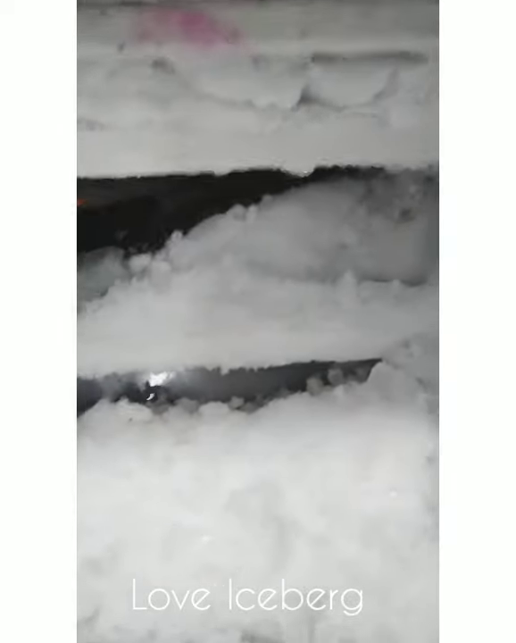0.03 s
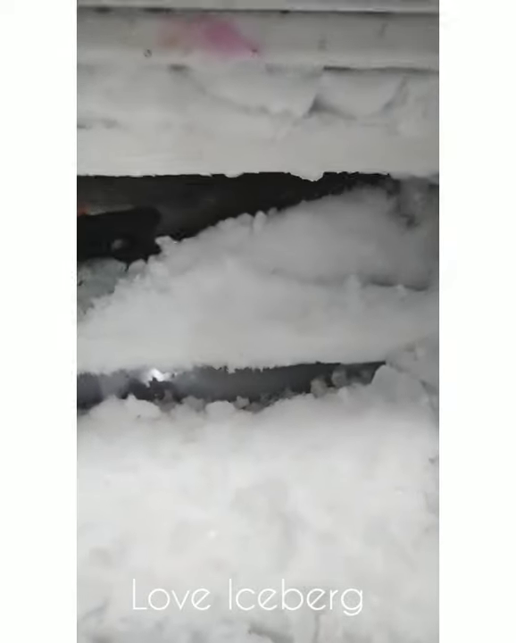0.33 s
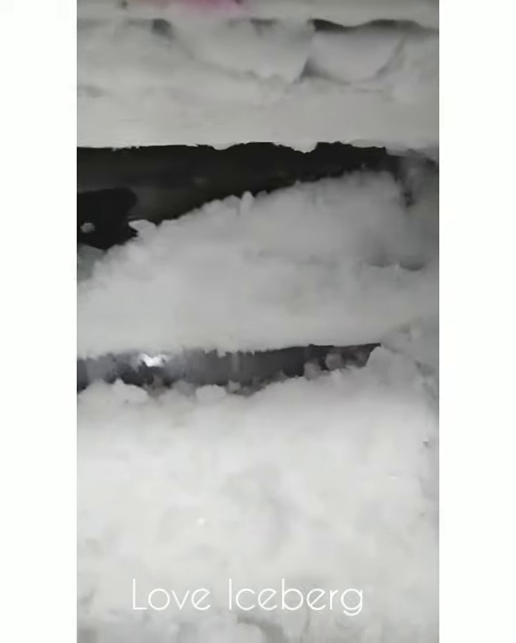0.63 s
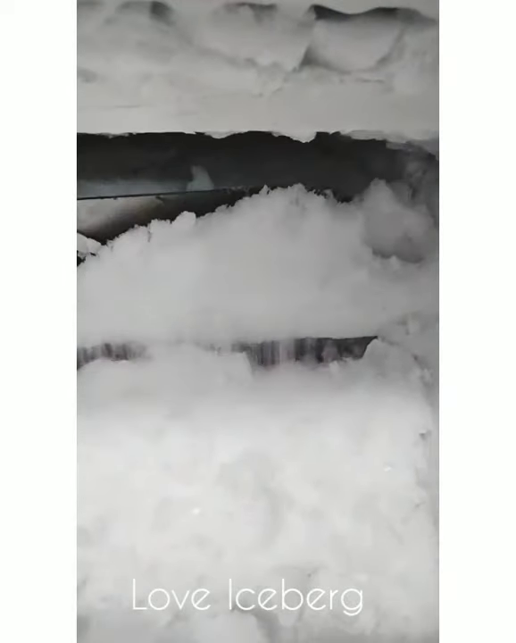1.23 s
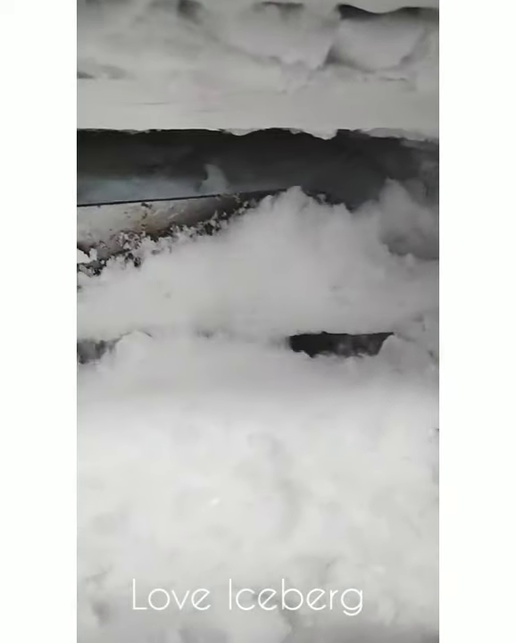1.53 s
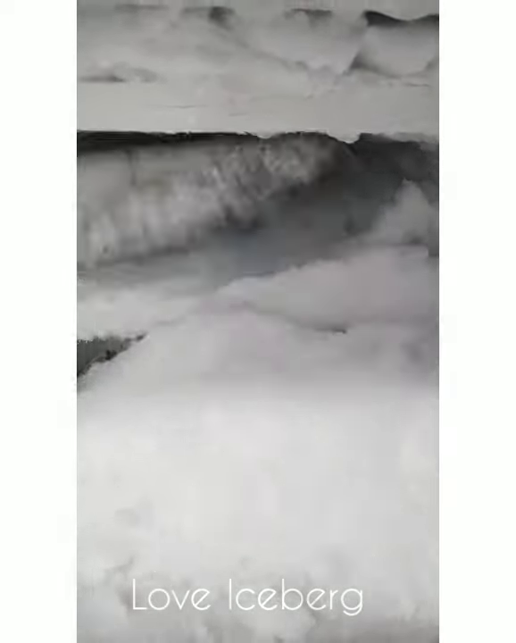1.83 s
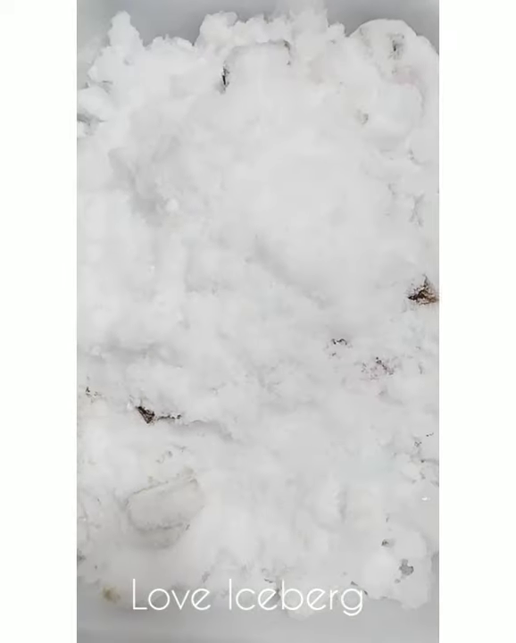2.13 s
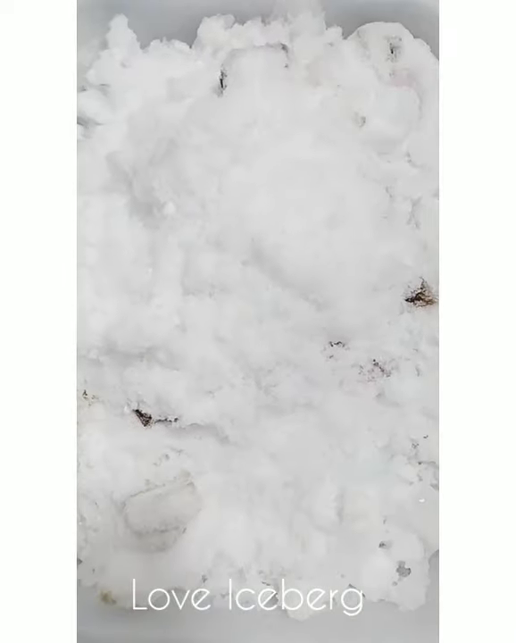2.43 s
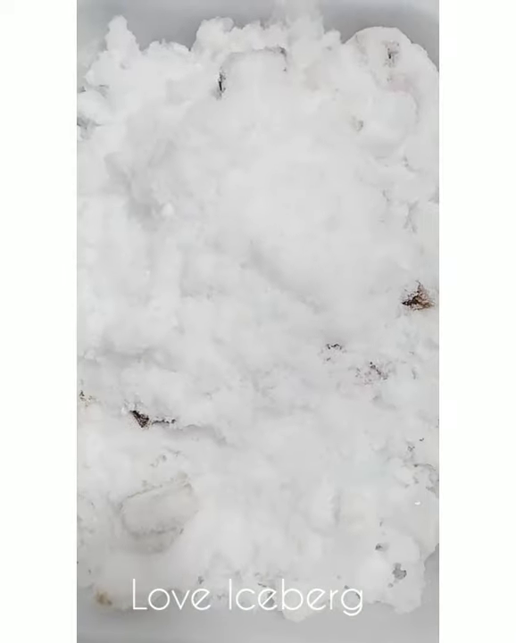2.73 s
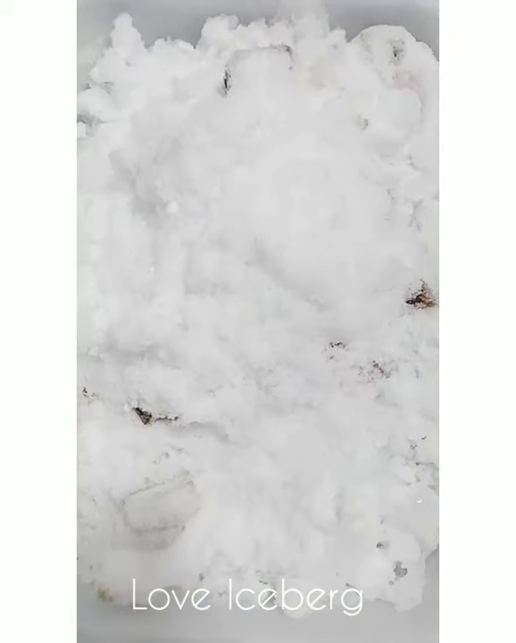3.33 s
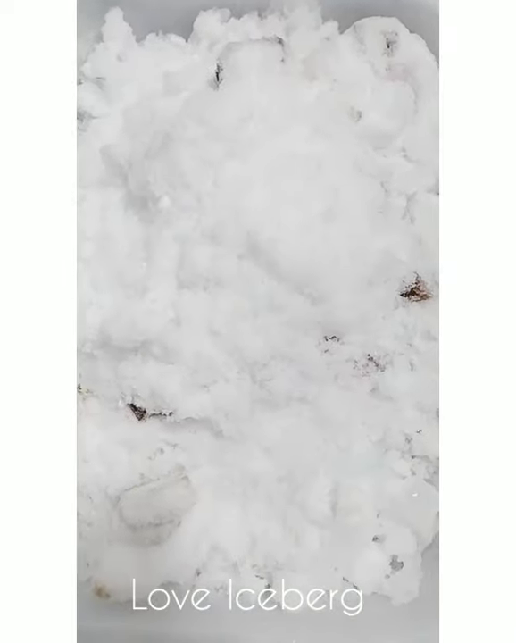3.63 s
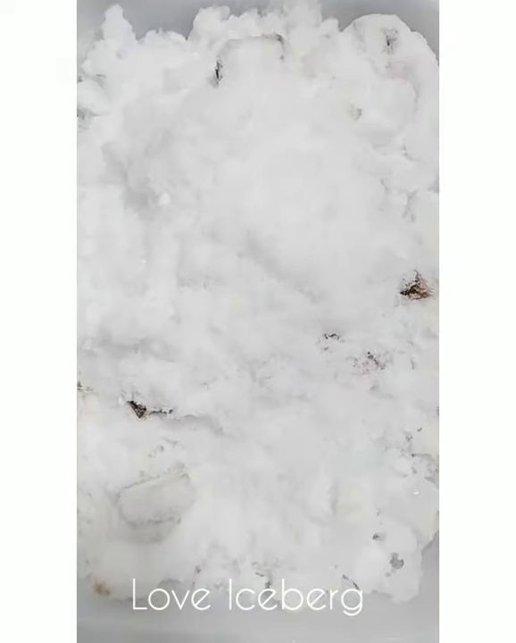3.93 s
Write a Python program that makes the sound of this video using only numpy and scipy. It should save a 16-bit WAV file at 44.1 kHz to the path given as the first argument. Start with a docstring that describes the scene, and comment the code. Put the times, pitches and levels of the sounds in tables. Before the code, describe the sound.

Loud, close scraping chips ice out of a humming freezer, with crisp crackles and a couple of low bumps. Halfway through it stops, leaving low room noise, faint handling scuffs, a tick and a light tap.

```python
"""Scraping frost from a freezer

Thick frost is scraped off a running freezer in uneven strokes, very close by. Countless ice crystals
snap, clumps break away, and the hollow cabinet answers over the compressor's hum. After about two
seconds the sound cuts to a quiet room with faint scuffs, rustles, a tick and a tap."""
import sys
import numpy as np
from scipy import signal
from scipy.fft import rfft, irfft, next_fast_len
from scipy.io import wavfile
from scipy.ndimage import map_coordinates

SR = 44100
rng = np.random.default_rng(int(sys.argv[2]) if len(sys.argv) > 2 else 0)


def persist_wave(psi):
    """Save psi, clipped to +-1, as 16-bit WAV."""
    counts = np.round(np.clip(psi, -1, 1) * 32767).astype(np.int16)
    wavfile.write(sys.argv[1], SR, np.atleast_2d(counts).T)


N = 176400

# The four pitch bands of the scraping: cabinet, crunch, sizzle, fizz. Each row: low and high edge in Hz.
ICE_BANDS = [(115, 700), (700, 7000), (7000, 11000), (11000, 16000)]
# Strokes of the blade. Each row: start and end in seconds, four band levels in dB, swell in dB.
BLADE_STROKES = [(0.052, 0.091, -35.5, -37.5, -33, -35.5, -0.5), (0.183, 0.218, -59, -34, -24, -29, 2),
                 (0.223, 0.319, -39.5, -37, -31.5, -36.5, 1.5),
                 (0.315, 0.486, -28.5, -34.5, -27.5, -36, -0.5), (0.505, 0.62, -31, -31.5, -24, -32, 1),
                 (0.613, 0.663, -25.5, -35.5, -30, -34, 0.5),
                 (0.713, 0.767, -28.5, -33.5, -33, -39.5, -1.5),
                 (0.754, 0.823, -27.5, -31.5, -25.5, -31.5, -4.5), (0.86, 0.936, -33.5, -34, -33, -32, -3),
                 (0.944, 1, -28, -35.5, -30, -30, 2.5), (1.024, 1.049, -28, -41, -31, -34, -7),
                 (1.071, 1.095, -28.5, -39.5, -36, -42.5, -5),
                 (1.099, 1.144, -26.5, -30.5, -30.5, -37.5, -2.5),
                 (1.126, 1.46, -33.5, -33.5, -30.5, -31, 3.5), (1.465, 1.507, -33, -29.5, -24.5, -29, -4.5),
                 (1.586, 1.625, -28.5, -30.5, -26, -34.5, -5), (1.69, 1.774, -33.5, -32.5, -30, -29.5, 0),
                 (1.802, 1.821, -33.5, -31.5, -36, -34, -7), (1.872, 1.895, -41, -36.5, -52, -48, 5)]
# Clumps of ice breaking away. Each row: time in seconds, four band levels in dB.
CLUMP_BREAKS = [(.01, -19, -31, -30, -36.5), (0.13, -59, -57, -43, -51.5), (.361, -25, -33.5, -20.5, -29),
                (0.514, -47, -43, -26.5, -32), (1.107, -30.5, -36.5, -23, -23), (1.608, -27, -27, -24, -21),
                (1.756, -34, -24, -22.5, -22.5), (1.917, -35, -36.5, -23, -24.5)]
# Loose crumbs between strokes. For each band: level in dB halfway through the scraping.
CRUMB_LEVELS = [-35, -42.5, -44, -47]
# More crumbs fall as the ice gives way. For each band: growth in dB per second.
CRUMB_GROWTH = [0.5, 0.5, 1, 5.5]
# The blade lifts clear. Each row: time and half-length in seconds, drop in the crumbs' level in dB.
BLADE_LIFTS = [(0.115, .012, 6.5), (0.688, .018, 7), (1.568, .01, -0.5)]
# Pitches boosted or weakened in the scraping, including the microphone's bright peak near 8.5 kHz.
# Each row: pitch in Hz, width in Hz, boost in dB.
SCRAPE_RESONANCES = [(154, 12, 8), (238, 18, -2), (315, 6.7, 6.5), (538.6, 56, 14), (824, 100, 5),
                     (1550, 180, 4.5), (1912, 160, 2.5), (3200, 90, -1.5), (4380, 130, 4.5), (7900, 80, -3),
                     (8430, 160, 6.5), (9150, 120, 4.5)]
# Brief, narrow rings and squeaks during the scraping.
# Each row: start and end in seconds, pitch and width in Hz, level in dB.
NARROW_RINGS = [(.33, .6, 8700, 360.7, -32.5), (0.712, 0.95, 8600, 255, -36),
                (.752, 0.72, 8670, 200, -28.5), (0.87, 0.922, 8500, 200, -26),
                (0.337, 0.46, 8150, 350, -34.5), (0.99, 1.01, 588, 46.3, -37), (1.094, 1.113, 385, 90, -25),
                (1.604, 1.625, 565, 46.3, -31), (1.74, 1.78, 560, 32.4, -26), (1.739, 1.75, 3260, 310, -28),
                (0.53, 1.416, 15000, 583, -44)]
# The compressor's tones. Each row: pitch in Hz, level in dB.
HUM_TONES = [(99.9, -30.5), (64.8, -42.5)]
# The scraper bumps the cabinet. Each row: time in seconds, level in dB.
CABINET_BUMPS = [(0.014, -19), (1.108, -22)]
# Scuffs of the hand. Each row: start in seconds, level in dB.
HAND_SCUFFS = [(1.985, -64.5), (2.387, -52.5), (3.56, -58.5)]
# Handling rustles. Each row: time and half-length in seconds, level in dB.
HANDLING_RUSTLES = [(2.011, .03, -52.5), (2.626, 0.014, -67), (2.733, 0.0245, -64.5), (3.24, 0.062, -61),
                    (3.604, 0.035, -59), (3.751, .008, -64)]
# The tones of the tap. Each row: pitch in Hz, relative level in dB, seconds to fade by 60 dB.
TAP_TONES = [(378, 1.5, 0.052), (480, -8.5, .03), (990, -21, 0.088), (1350, -12, 0.038), (1850, -11, .025),
             (3770, -7, 0.014)]

# A spectrum gives a sound its colour, from low to high. Each row: frequency in Hz, relative level in dB.
ICE_SPECTRUM = [(100, 16.5), (160, 8.5), (280, 4), (420, 0), (700, -5), (2000, -8), (3500, -13),
                (5500, -12), (7000, -10), (7800, -7.5), (8800, -2), (10200, -7), (11200, -13.5),
                (13000, -10), (14300, -4), (15800, -4)]  # a snapping crystal
SHUDDER_SPECTRUM = [(20, -9.5), (40, -3), (60, -4), (110, -6), (150, -10), (300, -45.5)]  # the rumbling cabinet
ROOM_SPECTRUM = [(12, -51), (20, 10.5), (27, -11), (59, 0), (122, -16.5), (225, -15.5), (298, -20),
                 (382, -16), (416, -23), (534, -24), (932, -29.5), (1100, -25.5), (1200, -30),
                 (4310, -38.5), (15500, -42.5)]
SCUFF_SPECTRUM = [(300, -28), (900, 1), (1350, 3), (2400, -3.5), (3300, -10.5), (9000, -19), (15000, -25)]
RUSTLE_SPECTRUM = [(300, -26), (1200, 0), (3000, -5), (6000, -8), (8800, 11), (11500, -5), (15500, -2)]
TICK_SPECTRUM = [(500, -20.5), (7000, -13.5), (9000, -0.5), (11500, -14), (14000, 0.5), (16000, -5.5)]
CONTACT_SPECTRUM = [(200, -3.5), (500, 7), (1500, -9), (4000, -14), (6000, -19), (9000, -9), (15500, -30)]  # the touch that starts the tap

ATTACK_S, RELEASE_S = 0.001, 0.012  # how quickly strokes and rings rise and die away
FADE_S, SILENT_S, ROOM_START_S, ROOM_END_S = 1.8605, 1.935, 1.969, 3.93
TIME = np.arange(N) / SR  # in seconds


def amp(db):
    """Turn decibels into a number to multiply by."""
    return 10 ** (np.asarray(db) / 20)


def unit(x):
    """Scale a signal to an average (rms) strength of 1."""
    return x / np.sqrt(np.mean(x ** 2) + 1e-20)


def level_at(spectrum, hz):
    """Read a spectrum's level in dB between its rows."""
    frequencies, levels = np.transpose(spectrum)
    return np.interp(np.log(hz + 1), np.log(frequencies + 1), levels)


def wobble(per_s):
    """A smooth curve through per_s random values each second."""
    return map_coordinates(rng.standard_normal(N // 8), [TIME * per_s], mode="wrap")


def filtered(x, gain_at):
    """Scale each frequency of x by gain_at(hz), then bring the result to strength 1."""
    size = 2 * next_fast_len(N)
    gain = np.maximum(gain_at(np.fft.rfftfreq(size, 1 / SR)), 1e-6)
    cepstrum = irfft(np.log(gain))
    # Folding this in half makes the filter ring only after a sound, never before it.
    cepstrum[1:size // 2] *= 2
    cepstrum[size // 2 + 1:] = 0
    return unit(irfft(rfft(x, size) * np.exp(rfft(cepstrum)))[:N])


def coloured(x, spectrum):
    """Give x the colour of a spectrum, at strength 1."""
    return filtered(x, lambda hz: amp(level_at(spectrum, hz)))


def noise(spectrum):
    """Steady noise with the colour of a spectrum."""
    return coloured(rng.standard_normal(N), spectrum)


def held(start, end, attack_s, release_s):
    """A loudness curve that rises until start, holds, and dies away after end."""
    return np.exp(-np.maximum(start - TIME, 0) / attack_s - np.maximum(TIME - end, 0) / release_s)


def snaps(per_s=6000, spread_db=4):
    """Tiny clicks, like crystals snapping at random moments with very unequal force."""
    clicks = (rng.random(N) < per_s / SR) * np.sign(rng.standard_normal(N))
    force = amp(spread_db * np.minimum(rng.standard_normal(N), 2))
    return unit(clicks * force)


def crunch(cracks_per_s=260, cracks_db=-6):
    """Larger crystals crack here and there among the fine snaps."""
    cracks = (rng.random(N) < cracks_per_s / SR) * rng.uniform(-1, 1, N)
    return unit(snaps() + amp(cracks_db) * unit(cracks))


def compartment_echo(x, fade_s=0.057, echo_db=-3.5, moves_per_s=14):
    """Add the short, dense echo of the frosted compartment, which changes as the blade moves."""
    age = np.arange(SR // 12) / SR
    hop = int(SR / moves_per_s)
    padded, window = np.pad(x, (hop, hop)), signal.get_window("hann", 2 * hop)
    tails = rng.standard_normal((256, len(age))) * amp(-60 * age / fade_s)
    echoes = np.zeros(N + SR)
    for start, tail in zip(range(0, N, hop), tails):  # each slice of sound gets its own echo
        echo = signal.fftconvolve(padded[start:start + 2 * hop] * window, tail / np.linalg.norm(tail))
        echoes[start:start + len(echo)] += echo
    return x + amp(echo_db) * echoes[hop:hop + N]


def ice_colour(hz, low_hz, high_hz):
    """How strong each frequency of the scraping is within one band."""
    in_band = ((1 + (low_hz / (hz + 1)) ** 14) * (1 + (hz / high_hz) ** 14)) ** -.5
    boost_db = sum(db / (1 + (2 * (hz - pitch) / width) ** 2) for pitch, width, db in SCRAPE_RESONANCES)
    return in_band * amp(level_at(ICE_SPECTRUM, hz) + boost_db)


def ice_loudness(band):
    """The strength of one band over time: loose crumbs, blade strokes and breaking clumps add up."""
    crumbs = amp(CRUMB_LEVELS[band] + CRUMB_GROWTH[band] * (TIME - FADE_S / 2))
    for when, length, drop_db in BLADE_LIFTS:
        crumbs *= amp(-drop_db * np.exp(-((TIME - when) / length) ** 2))
    power = crumbs ** 2
    for start, end, *levels, swell_db in BLADE_STROKES:
        progress = np.clip((TIME - start) / (end - start), 0, 1) - .5
        soft_start_db = -1.5 * np.exp(-np.maximum(TIME - start, 0) / 0.0065)
        shape = held(start + ATTACK_S, end - RELEASE_S / 2, ATTACK_S, RELEASE_S)
        power += (shape * amp(levels[band] + swell_db * progress + soft_start_db)) ** 2
    rise_s, fall_s = 0.0099, (0.015 if band == 0 else 0.0064)  # the cabinet band lingers longest
    for when, *levels in CLUMP_BREAKS:
        width = np.where(TIME < when, rise_s, fall_s)
        power += amp(levels[band]) ** 2 * np.exp(-((TIME - when) / width) ** 2)
    return np.sqrt(power)


def shimmer(x, depth_db=1.2, changes_per_s=16):
    """Narrow patches of the spectrum swell and sink at random."""
    slices = signal.stft(x, nperseg=512)[2]
    rows, columns = slices.shape
    slices_per_change = SR / 256 / changes_per_s
    grid = np.meshgrid(np.arange(rows), np.arange(columns) / slices_per_change, indexing="ij")
    swells = map_coordinates(rng.standard_normal(slices.shape), grid, order=1, mode="wrap")
    return signal.istft(slices * amp(depth_db * unit(swells)), nperseg=512)[1][:N]


def scraping(shared=0.62):
    """Bunches of snaps echo through the cabinet, with a ring or squeak now and then."""
    common = crunch()  # heard in every band; shared is its part of the power
    bunching = amp(wobble(220))
    sound = np.zeros(N)
    for band, edges in enumerate(ICE_BANDS):
        grains = bunching * (np.sqrt(shared) * common + np.sqrt(1 - shared) * snaps())
        ice = filtered(compartment_echo(grains), lambda hz: ice_colour(hz, *edges))
        sound += ice_loudness(band) * ice
    for start, end, hz, width_hz, db in NARROW_RINGS:
        resonator = signal.iirpeak(hz, hz / width_hz, SR)
        ring = unit(signal.lfilter(*resonator, bunching * rng.standard_normal(N)))
        sound += amp(db) * ring * held(start, end, ATTACK_S, RELEASE_S)
    return shimmer(sound)


def compressor_hum():
    """The compressor hums with two low, slightly wavering tones."""
    return sum(amp(db + .7 * wobble(2.7)) * np.sin(2 * np.pi * hz * TIME + .15 * wobble(6))
               for hz, db in HUM_TONES)


def cabinet_shudder(level_db=-39):
    """The cabinet shudders with a low, uneven rumble."""
    return amp(level_db + 1.5 * wobble(11)) * noise(SHUDDER_SPECTRUM)


def scraper_bumps(hz=136.4, half_length_s=0.016):
    """The scraper bumps the cabinet, which answers with a short, low thud."""
    sound = np.zeros(N)
    for when, db in CABINET_BUMPS:
        age = TIME - when
        sound += amp(db) * np.exp(-(age / half_length_s) ** 2) * np.sin(2 * np.pi * hz * age)
    return sound


def room_noise(level_db=-52, settling_db_per_s=0.86):
    """Low room noise that flutters a little and slowly settles."""
    from_middle_s = TIME - (ROOM_START_S + ROOM_END_S) / 2
    flutter_db = .5 * wobble(8)
    return amp(level_db - settling_db_per_s * from_middle_s + flutter_db) * noise(ROOM_SPECTRUM)


def hand_scuffs():
    """The hand slips a little, making short, grainy rubs."""
    loudness = sum(amp(db) * held(start + 0.0019, start + 0.0067, attack_s=0.0035, release_s=0.082)
                   for start, db in HAND_SCUFFS)
    return loudness * coloured(snaps(), SCUFF_SPECTRUM)


def rustles():
    """Handling makes faint, brief swells of crackle."""
    crackle = coloured(snaps() * amp(2.4 * wobble(120)), RUSTLE_SPECTRUM)
    return crackle * sum(amp(db) * np.exp(-.5 * ((TIME - when) / length) ** 2)
                         for when, length, db in HANDLING_RUSTLES)


def tick(start_s=2.473, length_s=.004, level_db=-45):
    """One thin tick: a tiny burst of bright noise."""
    shape = held(start_s, start_s + length_s, attack_s=.001, release_s=0.0027)
    return amp(level_db) * noise(TICK_SPECTRUM) * shape


def tap(start_s=3.205, contact_db=-50.5, ring_db=-37.5):
    """One soft tap: a puff of noise at the touch, and a few tones that quickly die away."""
    shape = held(start_s, start_s + 0.0078, attack_s=0.00089, release_s=0.0045)
    contact = amp(contact_db) * noise(CONTACT_SPECTRUM) * shape
    age = np.maximum(TIME - start_s, 0)
    ring = sum(amp(ring_db + db - 60 * age / fade_s) * np.sin(2 * np.pi * hz * age)
               for hz, db, fade_s in TAP_TONES)
    return contact + ring * (1 - np.exp(-age / 0.0019))


def scene():
    """The scraping and the freezer fade quickly, and the quiet room takes over."""
    freezer = scraping() + compressor_hum() + cabinet_shudder() + scraper_bumps()
    room = room_noise() + hand_scuffs() + rustles() + tick() + tap()
    freezer_fade = np.clip((SILENT_S - TIME) / (SILENT_S - FADE_S), 0, 1) ** 1.4
    room_fade = held(ROOM_START_S, ROOM_END_S, attack_s=0.0014, release_s=0.00526)
    return (freezer_fade * freezer + room_fade * room)[None]


def record(dry):
    """Cut away the very highest treble."""
    top_hz, edge_width_hz = 15850, 250
    size = next_fast_len(N + SR // 2)
    edge = np.clip((top_hz - np.fft.rfftfreq(size, 1 / SR)) / edge_width_hz + .5, 0, 1)
    return irfft(rfft(dry, size) * np.sin(np.pi / 2 * edge) ** 2, size)[..., :N]


dry = scene()
out = record(dry)
persist_wave(out)
```